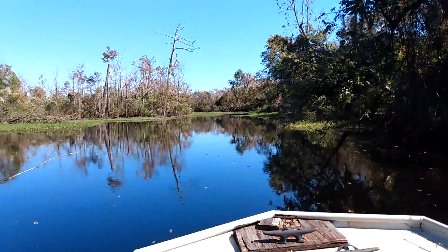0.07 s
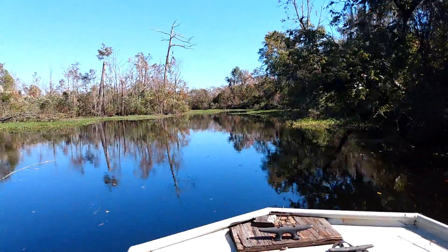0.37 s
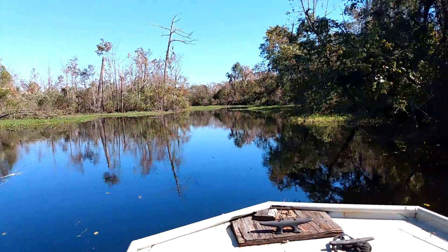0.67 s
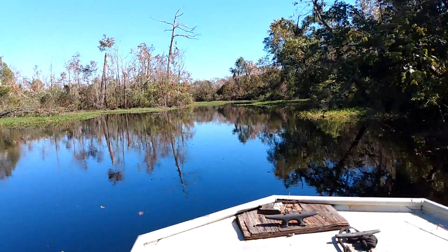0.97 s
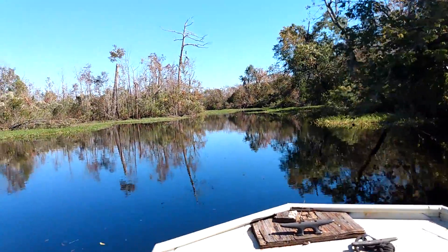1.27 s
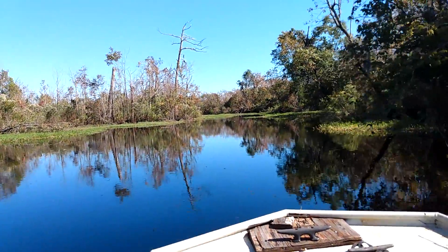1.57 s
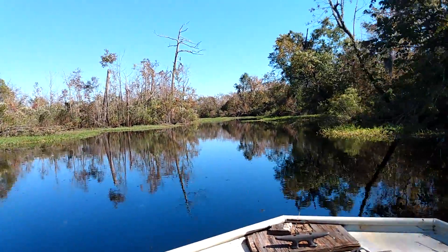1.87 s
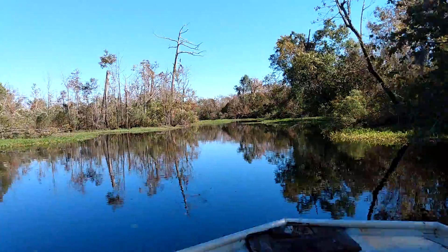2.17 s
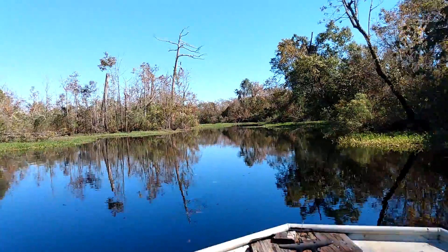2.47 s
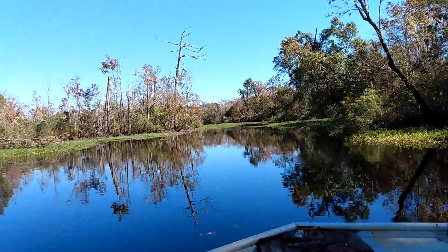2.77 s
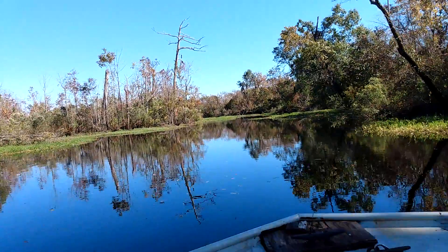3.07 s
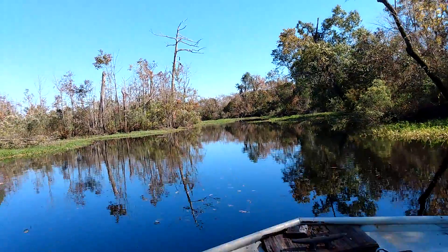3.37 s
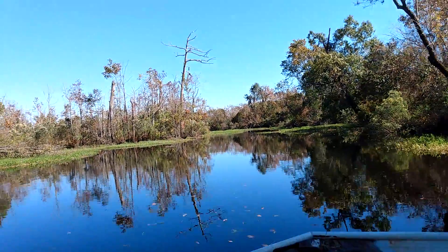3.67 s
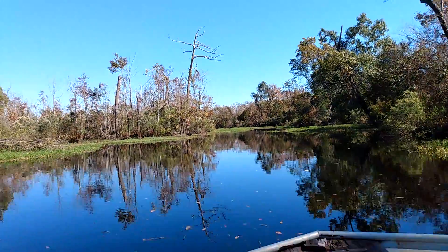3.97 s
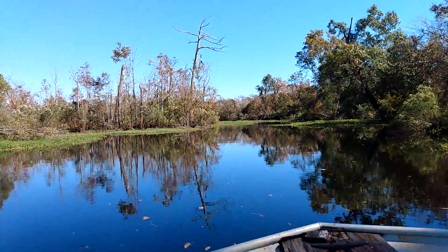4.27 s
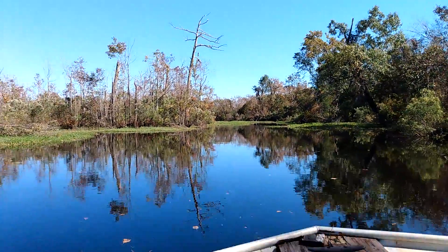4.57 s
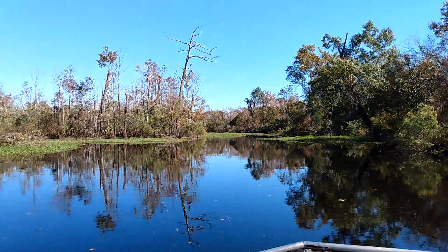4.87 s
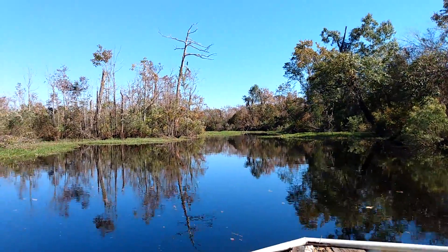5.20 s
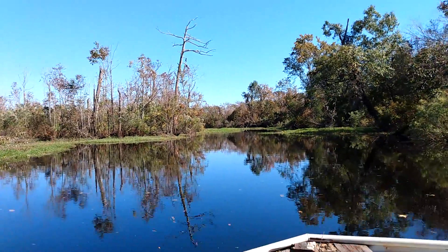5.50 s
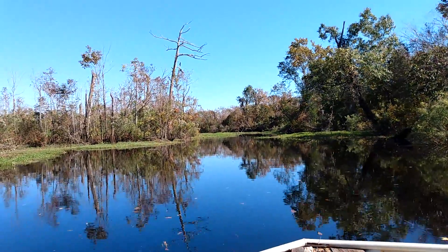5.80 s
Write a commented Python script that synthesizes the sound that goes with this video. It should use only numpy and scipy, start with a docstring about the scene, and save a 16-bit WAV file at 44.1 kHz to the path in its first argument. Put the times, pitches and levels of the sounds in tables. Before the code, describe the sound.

A small boat's outboard motor hums low while water gurgles and slaps at the bow, with a thin, high insect sizzle behind.

```python
"""A small boat idles along a calm river: the outboard hums, water gurgles under the bow and droplets
tick back down, beneath a thin, very high insect sizzle that grows throughout. One insect ticks a short
run; from 1 s on, wavelets slap the bow. After 3 s light wind starts to buffet the microphone and the
insect ticks again. At 3.75 s the motor eases off, sagging in pitch and booming once as it fades.
The strongest puff of wind comes just before the end."""
import sys
import numpy as np
from scipy import signal
from scipy.fft import rfft, irfft
from scipy.io import wavfile
from scipy.ndimage import uniform_filter1d

SR = 44100
rng = np.random.default_rng(int(sys.argv[2]) if len(sys.argv) > 2 else 0)


def log_audio(samples):
    """Write samples as a 16-bit WAV file to the path given in sys.argv[1]."""
    # one column per channel
    frames = np.atleast_2d(samples).T
    # limit to full scale, then quantise
    limited = np.clip(frames, -1, 1)
    pcm = np.round(limited * 32767).astype(np.int16)
    wavfile.write(sys.argv[1], SR, pcm)


N = 261954
TIME = np.arange(N) / SR

# how alike the two microphone ports hear diffuse noise: f/Hz, coherence/0-1
PORT_COHERENCE = [(150, .99), (350, .92), (600, .7), (1100, .35), (1700, .6), (2400, .25), (6000, .1),
                  (9000, 0)]
# phase of that noise between the ports: f/Hz, left lead/rad
PORT_PHASE = [(100, -0.04), (900, -0.3), (1300, 2.6), (1900, 2), (2300, 5)]
# tone of the ports against each other: f/Hz, nominal pan/dB (pan is always left minus right)
PORT_BALANCE = [(400, 0.5), (700, 1), (1100, -1.5), (1900, -6), (2500, 3), (3000, 2.5), (4200, 5),
                (5400, -6), (6100, 0), (7000, 10.5), (8400, -4), (10300, -4.5), (13700, -1), (14800, -10)]
# colour of the insect chorus: f/Hz, relative level/dB
CHORUS_SPECTRUM = [(7000, -46), (9500, -15), (11600, 2.5), (13700, 0), (14600, -10), (16000, 4.5)]
# nearer insects holding a buzz: start/s, end/s, centre f/Hz, width/octaves, level/dB
INSECT_BUZZES = [(.6, 1.55, 14200, 0.16, -59.5), (1.4, 2.45, 14500, 0.14, -61),
                 (2.35, 3.4, 13900, .04, -68), (4.0, 5.05, 13000, 0.13, -59), (5.1, 6.3, 15100, .16, -54)]
# one insect's runs of ticks: first t/s, spacing/s, tick count, level/dB
INSECT_TICKS = [(.376, .054, 5, -57), (3.464, .0593, 7, -53.5)]
# puffs of wind on the microphone: t/s, level/dB, length/s
WIND_PUFFS = [(3.108, -47, 0.075), (3.727, -42.5, 0.14), (5.776, -32, 0.055), (5.9, -41, 0.13)]
# colour of the water along the hull: f/Hz, relative level/dB
WASH_SPECTRUM = [(60, 4), (140, -3), (220, -2), (320, -3.5), (420, -9), (650, -6.5), (1000, -9.5),
                 (1700, -12), (2400, -20.5), (2900, -29), (4500, -33.5), (6800, -34), (8300, -42.5),
                 (16000, -31.5)]
# the largest droplets falling back: t/s, relative level/dB, centre f/Hz, pan/dB
BIG_DROPLETS = [(.231, -42, 12000, 0), (.763, -40, 6000, 5), (.887, -40, 6300, 6), (1.034, -34.5, 4200, 3),
                (1.14, -39, 8500, -1), (1.206, -42, 5800, 7), (1.741, -37.5, 5500, 1),
                (3.076, -37, 6240, 1), (3.258, -33.5, 6800, 7), (3.726, -41, 8000, -4),
                (4.321, -43, 4400, 0), (4.683, -35, 12500, -2), (4.881, -38, 5000, -6),
                (5.005, -36, 3600, 9), (5.286, -38, 12000, 5), (5.411, -37, 3200, 1)]
# wavelets hitting the bow: t/s, relative level/dB, centre f/Hz, pan/dB
BOW_SLAPS = [(1.035, -24, 606, 1), (1.349, -26, 425, -1.5), (1.536, -23, 657, -2), (1.875, -21.5, 646, 1),
             (2.158, -22.5, 727, -2), (2.768, -32, 525, -3), (3.229, -21.5, 353, -0.5),
             (3.449, -26, 361, 2), (3.626, -28, 694, 3), (3.787, -20.5, 581, -2.5), (3.95, -25, 719, -1.0),
             (4.607, -28, 1290, -2.0), (4.883, -25, 579, 3), (5.278, -23.5, 374, -1.5),
             (5.457, -25, 396, -1.5)]
# large bubbles, the lowest glugging under the hull: t/s, level/dB, f/Hz
BIG_BUBBLES = [(.763, -29, 1590), (1.016, -26.5, 340), (1.034, -31, 610), (1.036, -29.5, 1570),
               (2.691, -33, 2540), (3.315, -38.5, 2180), (3.627, -29, 1405), (3.68, -29, 202),
               (3.818, -30, 249), (3.952, -33, 1565), (4.609, -29, 1314), (4.819, -27, 250),
               (4.884, -27.5, 568), (5.104, -33, 2200), (5.47, -31.5, 1700), (5.765, -30, 257)]
# faint motor overtones: multiple of the four-stroke cycle, relative level/dB cruising, and eased off
MOTOR_OVERTONES = [(5, -48.5, -41.5), (6, -43.5, -53), (7, -49.5, -46.5), (8, -47, -47), (9, -48.5, -50),
                   (10, -51, -46.5), (12, -64.5, -50), (14, -56.5, -49.5)]


def amp(db):
    """Decibels to gain."""
    return 10 ** (np.asarray(db) / 20)


def unit(x):
    """Scales to rms 1."""
    return x / np.sqrt(np.mean(x ** 2) + 1e-20)


def curve_at(points, hz):
    """Reads a curve on a log-frequency axis."""
    f, value = np.transpose(points)
    return np.interp(np.log(hz + 1), np.log(f), value)


def add(mix, start_s, sound, pan_db=0, lead_s=0):
    """Places a sound in the mix, pan_db louder and lead_s earlier on the left."""
    for port, wave, side in zip(mix, np.broadcast_to(sound, (2, sound.shape[-1])), (.5, -.5)):
        part = port[max(round((start_s - side * lead_s) * SR), 0):][:len(wave)]
        part += amp(side * pan_db) * wave[:len(part)]


def drift(rate_hz):
    """Random modulation of rms 1, with nothing much faster than rate_hz."""
    hz = np.fft.rfftfreq(N, 1 / SR)
    return unit(irfft(rfft(rng.standard_normal(N)) / (1 + (hz / rate_hz) ** 4), N))


def band(x, centre_hz, octaves):
    """Band-pass, bell-shaped on a log-frequency axis."""
    hz = np.fft.rfftfreq(x.shape[-1], 1 / SR)
    bell = np.exp(-.5 * (np.log2((hz + 1) / centre_hz) / octaves) ** 2)
    return irfft(rfft(x) * bell, x.shape[-1])


def spectral_grid(fft_size):
    """Frame count and bin frequencies of a spectrogram spanning the scene."""
    return N // (fft_size // 4) + 5, np.fft.rfftfreq(fft_size, 1 / SR)


def diffuse_noise(spectrogram_db, fft_size):
    """A noise bed as the two ports hear it: nearly mono in the lows, wide in the highs."""
    _, hz = spectral_grid(fft_size)
    draws = rng.standard_normal(spectrogram_db.shape + (4,))
    left = draws[..., 0] + 1j * draws[..., 1]
    independent = draws[..., 2] + 1j * draws[..., 3]
    coherence = curve_at(PORT_COHERENCE, hz)
    right = coherence * left + np.sqrt(1 - coherence ** 2) * independent
    right *= np.exp(-1j * curve_at(PORT_PHASE, hz))
    spectra = np.array([left, right]) * amp(spectrogram_db)
    _, noise = signal.istft(spectra.transpose(0, 2, 1), nperseg=fft_size, noverlap=fft_size * 3 // 4)
    return noise[:, :N]


def insect_chorus(start_db=-63.5, rise_db_per_s=1.32, throb_db=3.5, throb_hz=70):
    """Many wings rasp together, a bed that grows as the boat moves along the bank."""
    frames, hz = spectral_grid(512)
    colour = np.tile(curve_at(CHORUS_SPECTRUM, hz), (frames, 1))
    level_db = start_db + rise_db_per_s * TIME + throb_db * drift(throb_hz)
    return amp(level_db) * unit(diffuse_noise(colour, 512))


def buzzing_insects(fade_s=.33, throb_db=3.5, throb_hz=70):
    """Single insects stand out of the chorus, each rasping in its own narrow band."""
    out = np.zeros((2, N))
    for start, end, hz, octaves, db in INSECT_BUZZES:
        fade = np.clip(np.minimum(TIME - start, end - TIME) / fade_s, 0, 1)
        level_db = db + throb_db * drift(throb_hz)
        out += amp(level_db) * fade * unit(band(rng.standard_normal((2, N)), hz, octaves))
    return out


def ticking_insect(centre_hz=13300, octaves=0.16, stroke_s=.0045):
    """A nearer insect closes its wings in single, evenly spaced strokes."""
    out, t = np.zeros((2, N)), np.arange(1024) / SR
    stroke = np.exp(-((t - t.mean()) / stroke_s) ** 2)
    for first_s, spacing_s, count, db in INSECT_TICKS:
        for k in range(round(count)):
            rasp = unit(band(rng.standard_normal((2, len(t))), centre_hz, octaves))
            add(out, first_s + k * spacing_s - t.mean(), amp(db) * stroke * rasp, pan_db=1)
    return out


def wind(centre_hz=165, octaves=0.56):
    """Air buffets the microphone in soft, low, mono puffs."""
    envelope = sum(amp(db) * np.exp(-(2 * (TIME - s) / length) ** 2) for s, db, length in WIND_PUFFS)
    return envelope * unit(band(rng.standard_normal(N), centre_hz, octaves))


def hull_wash(lapping, flow_db=-36.5, patchy_db=1.5, lap_db=0.82, swell_db=0.05, low_cut_hz=55):
    """Water churns along the hull: patches of noise come and go, lifted by each wavelet."""
    frames, hz = spectral_grid(1024)
    patches = rng.standard_normal((frames, len(hz)))
    patches = uniform_filter1d(patches, size=6, axis=0)  # smear in time
    patches = unit(uniform_filter1d(patches, size=14, axis=1))  # and in frequency
    churn = diffuse_noise(curve_at(WASH_SPECTRUM, hz) + patchy_db * patches, 1024)
    churn = signal.sosfilt(signal.butter(2, low_cut_hz, "highpass", fs=SR, output="sos"), churn)
    return amp(flow_db + swell_db * drift(rate_hz=2.7) + lap_db * lapping) * unit(churn)


def droplets(trim_db=-7, t60=0.015, rebound_s=0.0024, rebound_db=-7, fine_count=40):
    """A droplet ticks on the surface and ticks again as its crater closes; fine ones fall at random."""
    out, t = np.zeros((2, N)), np.arange(2048) / SR
    low_hz, high_hz = 3500, 13000
    fine = [(when * N / SR, -49.5 + 6 * size ** 2, low_hz * (high_hz / low_hz) ** pitch, 2 * place - 1)
            for when, size, pitch, place in rng.random((fine_count, 4))]
    for s, db, hz, pan_db in list(BIG_DROPLETS) + fine:
        decay = amp(db + trim_db - 60 * t / t60)
        impact, rebound = decay * unit(band(rng.standard_normal((2, 2, len(t))), hz, octaves=0.47))
        add(out, s, impact, pan_db)
        add(out, s + rebound_s, amp(rebound_db) * rebound, pan_db)
    return out


def bubble(hz, decay_s):
    """A bubble rings and dies, rising slightly in pitch as it nears the surface."""
    age = np.arange(0, 5, 1 / (decay_s * SR))  # in decay times
    envelope = (1 - np.exp(-8 * age)) * np.exp(-age)
    return envelope * np.sin(2 * np.pi * hz * decay_s * age * (1 + .015 * age))


def bubble_cloud(level_db, low_hz, high_hz, count, decay_cycles, spread_db, tilt_db, lead_s, scatter_s):
    """Bubbles of many sizes ring at random moments and places around the bow; tilt_db is per octave."""
    out = np.zeros((2, N))
    for when, pitch, strength, place in rng.random((count, 4)):
        hz = low_hz * (high_hz / low_hz) ** pitch
        accent_db = spread_db * min(-np.log(1 - strength), 3)  # a few poke out of the texture
        ring = amp(accent_db + tilt_db * np.log2(hz / low_hz)) * bubble(hz, decay_cycles / hz)
        side = 2 * place - 1
        add(out, when * N / SR, ring, pan_db=6 * side, lead_s=lead_s + scatter_s * side)
    return amp(level_db) * unit(out)


def plops(decay_at_1khz_s=0.0073):
    """A folding wavelet traps one large bubble; the lower its note, the longer it rings."""
    out = np.zeros((2, N))
    for s, db, hz in BIG_BUBBLES:
        decay_s = decay_at_1khz_s * (1000 / hz) ** 0.57
        add(out, s, amp(db) * bubble(hz, decay_s), lead_s=.0001)
    return out


def bow_slaps(trim_db=-10, octaves=0.82, attack_s=0.00201, t60=0.12):
    """Each wavelet claps on the bow with a short burst of froth."""
    out, t = np.zeros((2, N)), np.arange(8192) / SR
    for s, db, hz, pan_db in BOW_SLAPS:
        shared, left, right = band(rng.standard_normal((3, len(t))), hz, octaves)
        froth = unit(shared + np.array([left, right]))
        envelope = amp(db + trim_db - 60 * t / t60) * (1 - np.exp(-t / attack_s))
        add(out, s - attack_s, envelope * froth, pan_db)
    return out


def outboard_motor(cruise_hz=80.3, ease_at_s=3.75, sag_hz_per_s=2.45, settle_s=0.57,
                   overtone_trim_db=-1, waver=0.27, shake=0.043, right_lead_s=0.00031, pan_db=-0.45):
    """Strong and weak exhaust beats alternate; faint overtones waver as the hull shakes."""
    # easing off, the firing rate sags and the two main tones weaken with it
    sag_hz = sag_hz_per_s * np.maximum(TIME - ease_at_s, 0)
    # on the way down the firing tone booms once: slow build, faster release
    boom_at_s, boom_db, rise_s, fall_s = 4.45, 4.5, 0.78, 0.34
    boom = np.exp(-((TIME - boom_at_s) / np.where(TIME < boom_at_s, rise_s, fall_s)) ** 2)
    firing_db = -26.5 - 0.56 * sag_hz + boom_db * boom
    shaft_db = -33.5 - 0.66 * sag_hz
    cycle_hz = (cruise_hz - sag_hz) / 4  # two shaft turns and four firings per cycle
    phase = 2 * np.pi * (np.cumsum(cycle_hz) / SR + cycle_hz * np.array([[0], [right_lead_s]]))
    hum = amp(shaft_db) * np.cos(2 * phase) + amp(firing_db) * np.cos(4 * phase)
    hum *= 1 + shake * drift(rate_hz=3.8)
    eased = np.clip((TIME - ease_at_s) / settle_s, 0, 1)
    for multiple, cruise_db, eased_db in MOTOR_OVERTONES:
        gain = amp(overtone_trim_db + cruise_db + eased * (eased_db - cruise_db))
        gain *= 1 + waver * drift(rate_hz=1.24)
        hum += gain * np.cos(round(multiple) * phase + 2 * np.pi * rng.random())
    return np.sqrt(2) * hum * amp([[pan_db / 2], [-pan_db / 2]])


def scene():
    """The open-air mix; small wavelets stir the wash and the three bubble layers together."""
    lapping = drift(rate_hz=27.0)
    gurgle = bubble_cloud(level_db=-51.5, low_hz=296.4, high_hz=1043, count=900, decay_cycles=1.8,
                          spread_db=3.5, tilt_db=-2.0, lead_s=-.000055, scatter_s=.00045)
    babble = bubble_cloud(level_db=-49.5, low_hz=1140, high_hz=2310, count=1800, decay_cycles=3.4,
                          spread_db=4, tilt_db=2, lead_s=.00027, scatter_s=.00006)
    fizz = bubble_cloud(level_db=-64.5, low_hz=2613, high_hz=7430, count=2000, decay_cycles=7.5,
                        spread_db=3, tilt_db=2.5, lead_s=.0001, scatter_s=.0004)
    stirred = (gurgle + babble) * amp(1.3 * lapping) + fizz * amp(2.3 * lapping)
    water = hull_wash(lapping) + stirred + bow_slaps() + plops() + droplets()
    return outboard_motor() + water + wind() + insect_chorus() + buzzing_insects() + ticking_insect()


def record(dry, high_cut_hz=15800):
    """The camera body colours each microphone port differently; a steep high cut trims the top."""
    hz = np.fft.rfftfreq(N, 1 / SR)
    shading = np.clip(hz / PORT_BALANCE[0][0], 0, 1)  # long waves bend round the body to both ports
    port_eq = amp(curve_at(PORT_BALANCE, hz) * np.array([[.5], [-.5]]) * shading)
    port_eq /= np.sqrt(np.mean(port_eq ** 2, axis=0))  # constant power across the pair
    edge_fades = signal.windows.tukey(N, .002)
    coloured = irfft(rfft(dry * edge_fades) * port_eq, N)
    high_cut = signal.firwin(1023, high_cut_hz, window=("kaiser", 9), fs=SR)
    return signal.oaconvolve(coloured, high_cut[None], "same")


dry = scene()
out = record(dry)
log_audio(out)
```